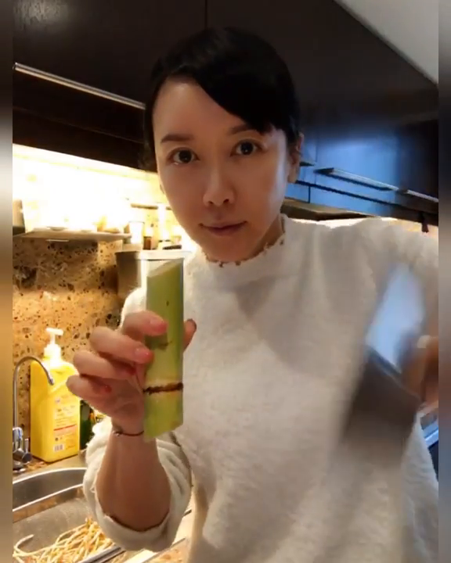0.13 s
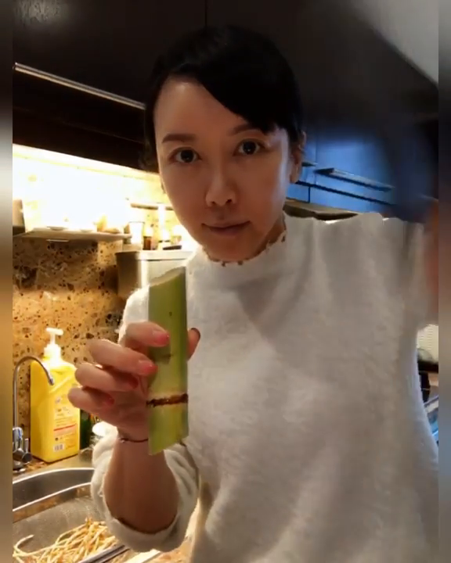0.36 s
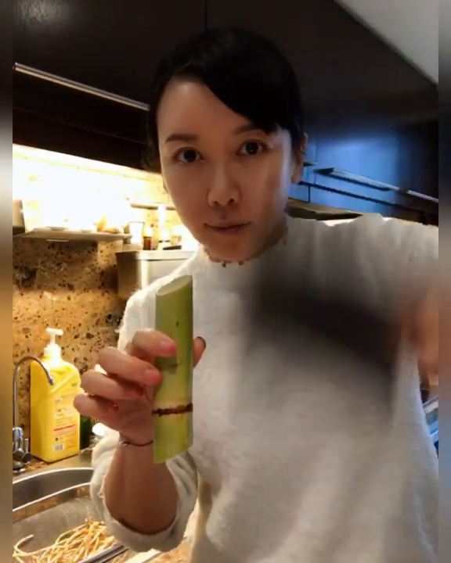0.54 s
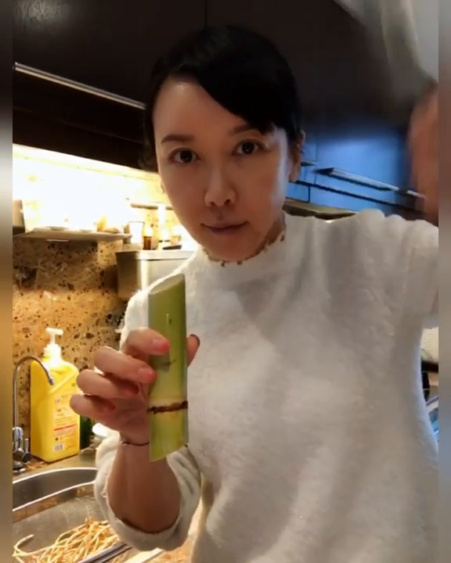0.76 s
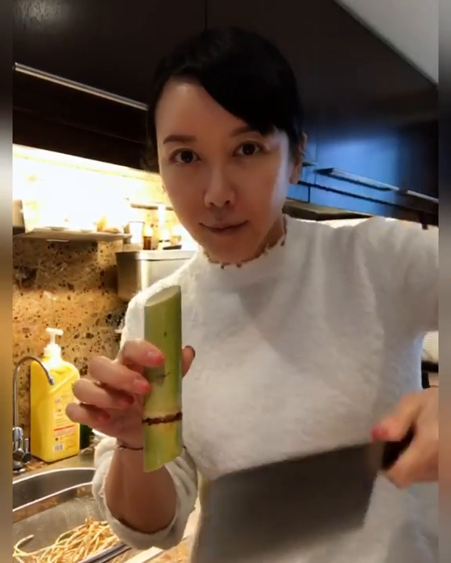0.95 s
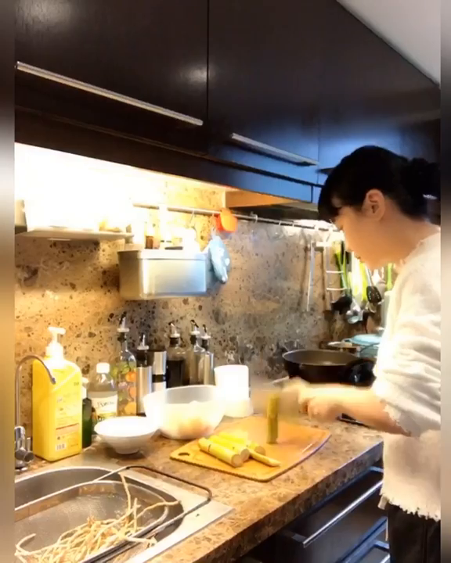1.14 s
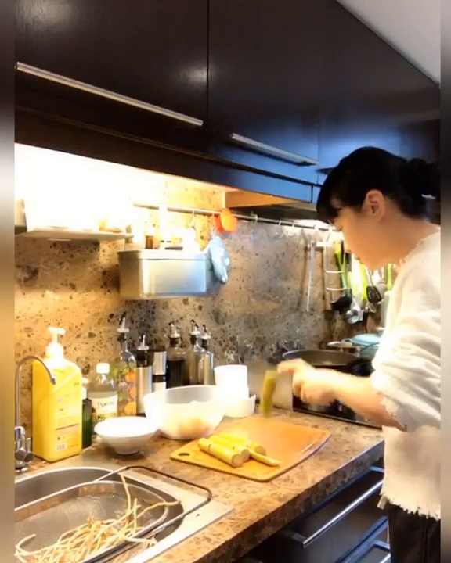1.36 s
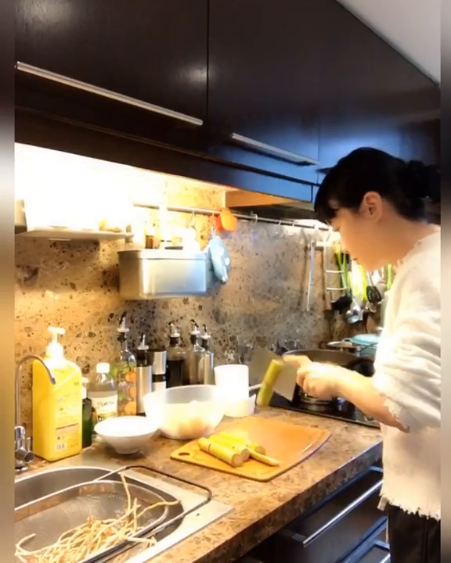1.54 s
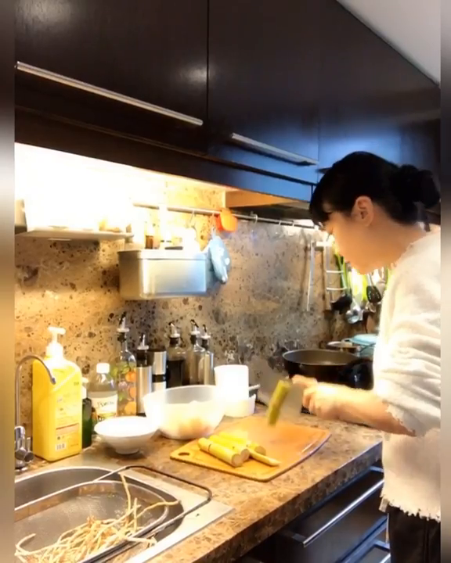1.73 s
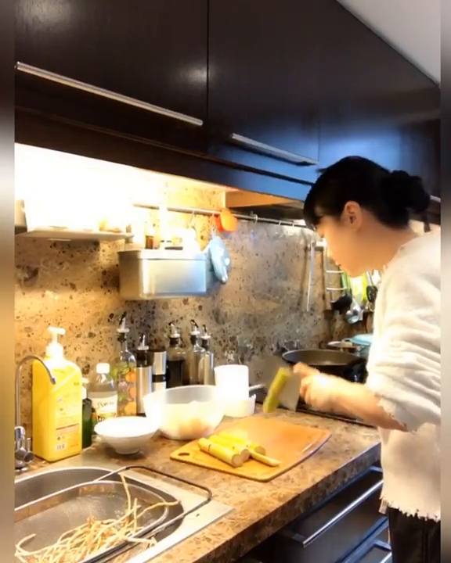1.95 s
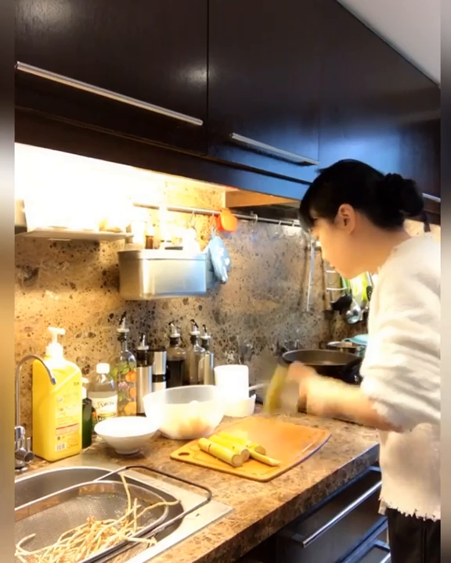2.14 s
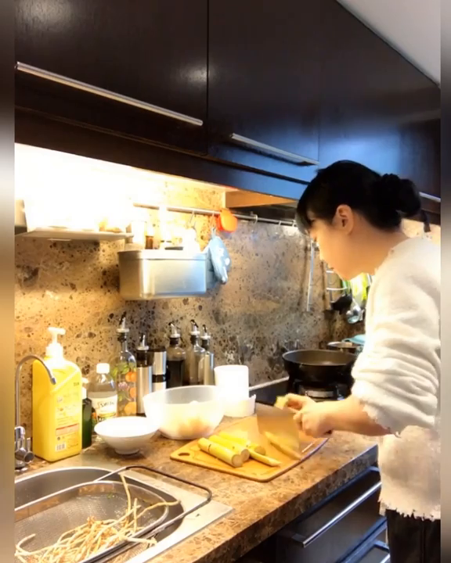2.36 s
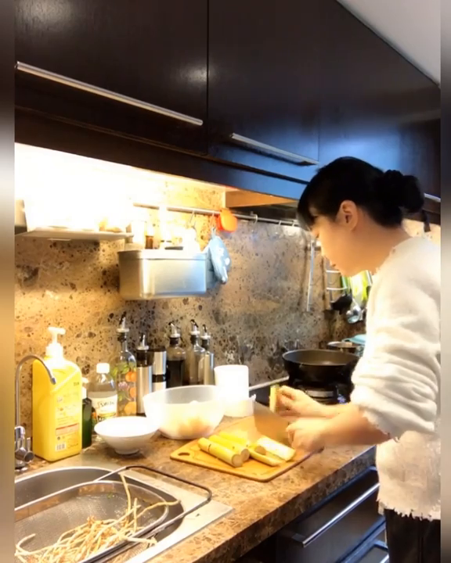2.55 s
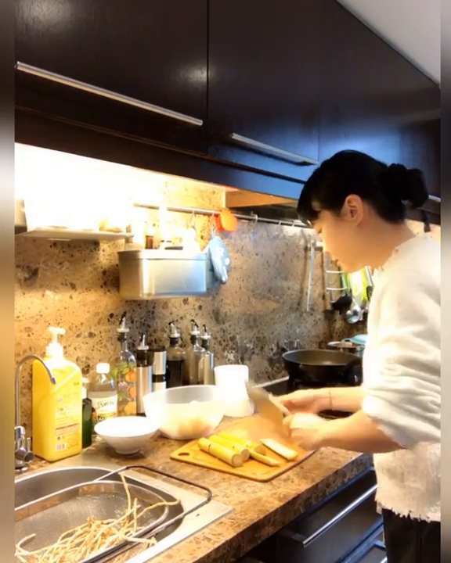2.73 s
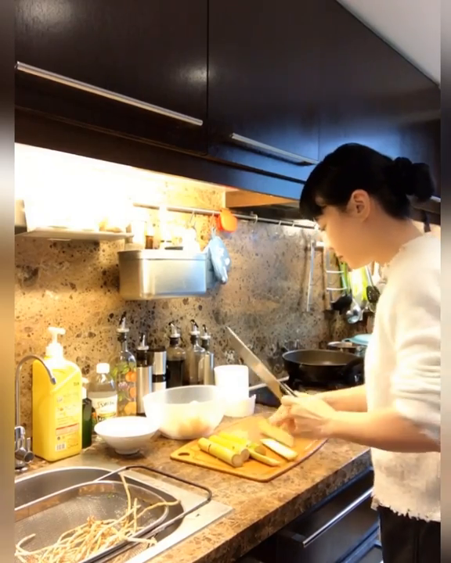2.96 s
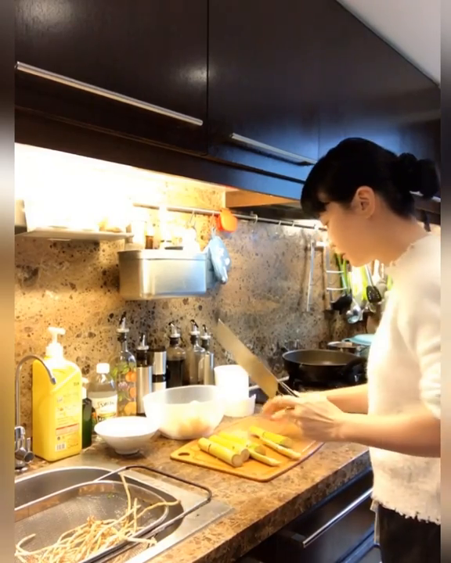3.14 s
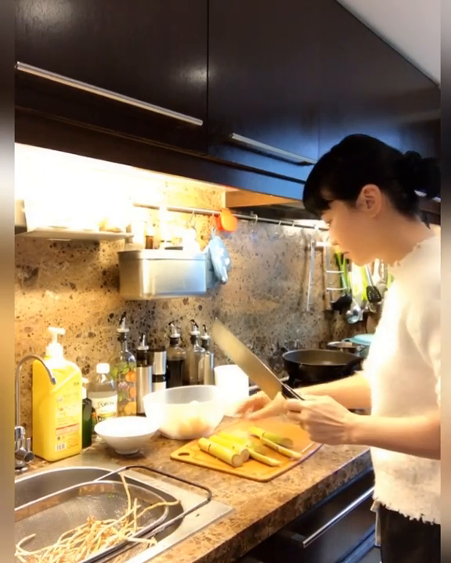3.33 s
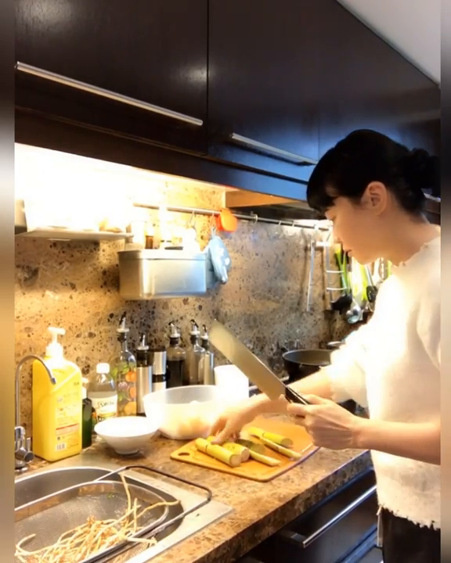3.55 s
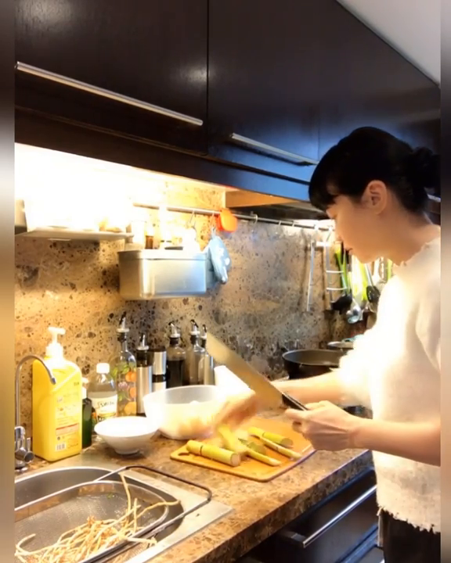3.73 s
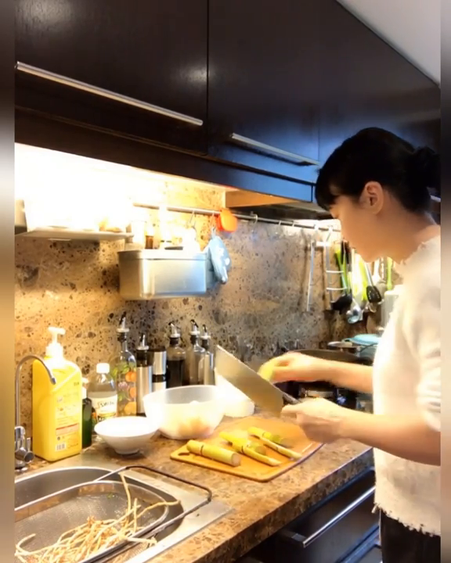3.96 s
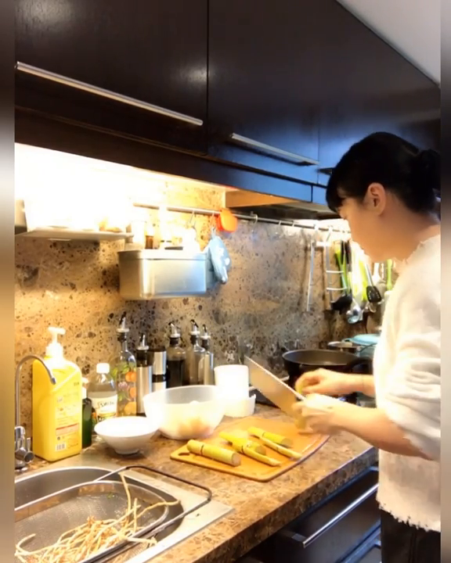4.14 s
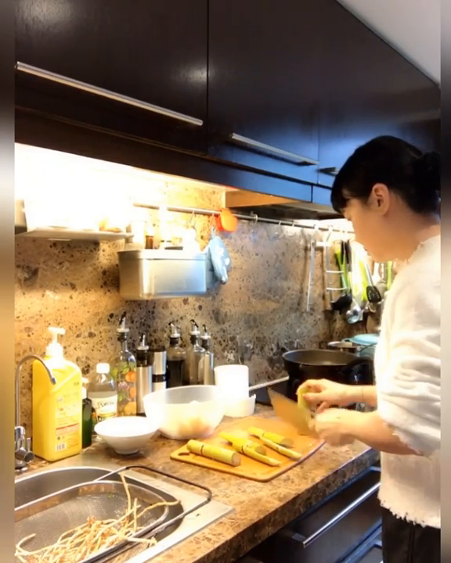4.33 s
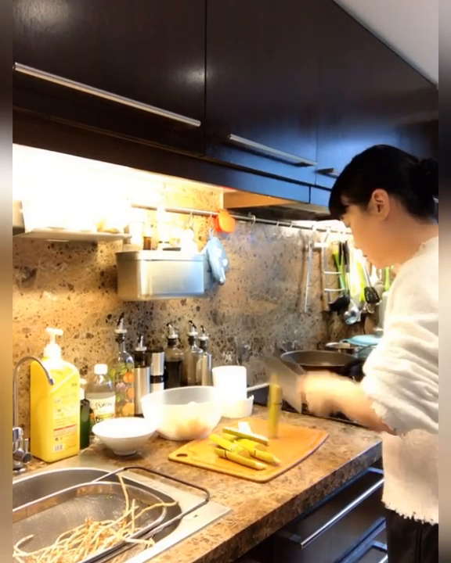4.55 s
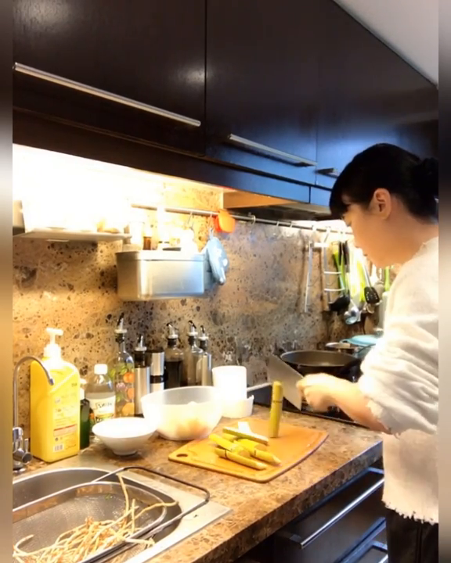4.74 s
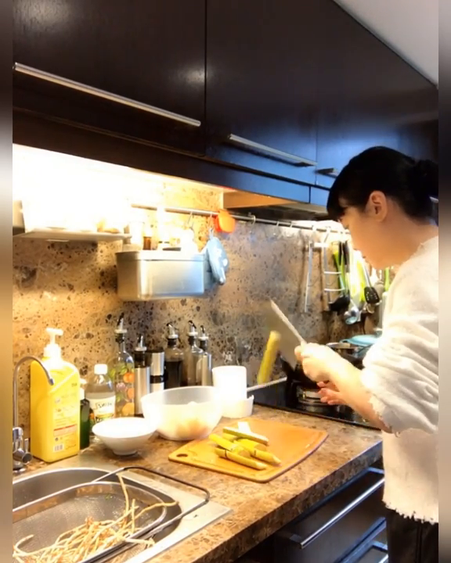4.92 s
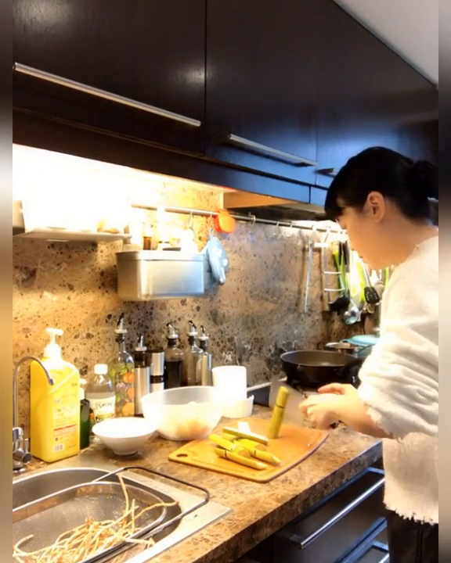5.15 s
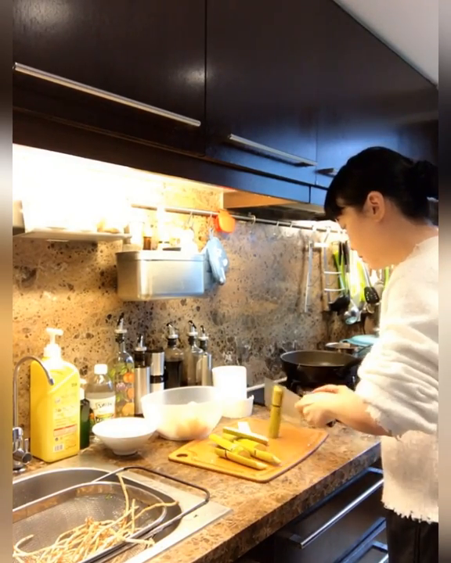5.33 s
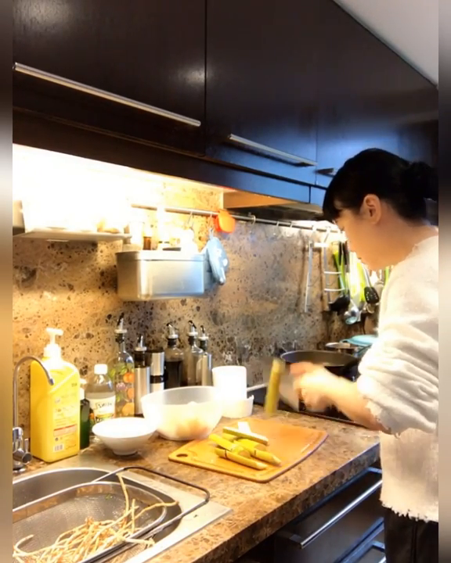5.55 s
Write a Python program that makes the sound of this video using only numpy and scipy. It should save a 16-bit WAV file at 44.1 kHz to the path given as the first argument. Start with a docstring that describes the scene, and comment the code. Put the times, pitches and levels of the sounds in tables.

```python
"""An appliance drones in a small kitchen; sugarcane rind ticks. At 1.1 s and 2.1 s a heavy cleaver,
wedged in the cane, is slammed onto a wooden board: fibres crack, board and worktop boom, the blade rings.
Split pieces topple, tick and are pushed aside, and the handled steel clinks at 2.5 s and 4.4 s.
A lighter blow follows at 4.6 s and a last heavy one at 5.0 s."""
import sys
import numpy as np
from scipy import signal
from scipy.fft import rfft, irfft
from scipy.io import wavfile
from scipy.ndimage import uniform_filter1d

SR = 44100
rng = np.random.default_rng(int(sys.argv[2]) if len(sys.argv) > 2 else 0)


def master(y):
    """Save y as 16-bit WAV."""
    cut = np.clip(np.atleast_2d(y).T, -1, 1)
    pcm = np.round(cut * 32767)  # scale
    wavfile.write(sys.argv[1], SR, pcm.astype(np.int16))


N = 246519
T = np.arange(SR // 2) / SR  # s since contact
TAPER = np.minimum(10 * (T[-1] - T), 1) ** 2
FREQ_HZ = np.maximum(np.arange(N // 2 + 1) * SR / N, 1)


def undb(db):
    """Decibels to gain."""
    return 10 ** (np.asarray(db) / 20)


def add(track, start_s, sound):
    """Mix a sound into the track."""
    start = max(int(start_s * SR), 0)
    track[start:start + len(sound)] += sound[:N - start]


def fade(t60_s):
    """Exponential decay after a contact."""
    return np.exp(-np.log(1000) * T / t60_s)


def colour(points, hz):
    """Gain of a (freq_hz, gain_db) curve at hz."""
    freq_hz, gain_db = np.transpose(points)
    return undb(np.interp(np.log(hz), np.log(freq_hz), gain_db))


def noise(gain):
    """Unit-rms noise with the given spectrum."""
    shaped = irfft(rfft(rng.standard_normal(N)) * gain, N)
    return shaped / shaped.std()


def ring(modes, weight=np.ones_like, rise_s=0.0007, neighbour_sign=-1):
    """Decaying modes; neighbours bend oppositely or together, and room echoes make each waver."""
    pitch_hz, gain_db, t60_s = np.transpose(modes)
    gains = undb(gain_db) * weight(pitch_hz) * np.sign(neighbour_sign) ** np.arange(len(pitch_hz))
    knots_s = np.arange(0, 1, .025)
    waves = np.zeros(len(T))
    for hz, gain, decay_s in zip(pitch_hz, gains, t60_s):
        swell, shift_rad = .28 * rng.standard_normal((2, len(knots_s))) * (knots_s > 0)
        envelope = gain * fade(decay_s) * (1 + np.interp(T, knots_s, swell))
        waves += envelope * np.sin(2 * np.pi * hz * T + np.interp(T, knots_s, shift_rad))
    return waves * (1 - np.exp(-T / rise_s)) * TAPER


def burst(gain, envelope, grain=0.):
    """Dense resonances: enveloped noise, flattened in spectrum, then shaped by gain(hz)."""
    hiss, scatter = rng.standard_normal((2, len(T)))
    grains = np.exp(grain * np.repeat(scatter, 20)[:len(T)] * fade(0.14))  # the room smooths them out
    spectrum = rfft(hiss * grains * envelope)
    spectrum /= np.sqrt(uniform_filter1d(np.abs(spectrum) ** 2, size=160))
    hz = np.maximum(np.arange(len(spectrum)) * SR / len(T), 1)
    return irfft(spectrum * gain(hz), len(T)) * TAPER


def kitchen(rise_s, contact_s, contact_db, early_t60_s, late_db, late_t60_s):
    """Envelope of a contact, quick echoes off tiles and cupboards, and the room tail."""
    contact = undb(contact_db) * np.exp(-(T / contact_s) ** 2)
    power = contact ** 2 + fade(early_t60_s) ** 2 + (undb(late_db) * fade(late_t60_s)) ** 2
    return np.sqrt(power) * (1 - np.exp(-T / rise_s))


# air spectrum: freq_hz, gain_db
AIR_SPECTRUM = [(20, -66.5), (32, -65.5), (70, -68.5), (110, -82.5), (180, -76), (300, -85.5), (500, -90.5),
                (1000, -93), (2000, -98.5), (4000, -107), (10000, -113), (12500, -122)]

def room_air(level_db=-47.5):
    """Steady, mostly low room noise."""
    return undb(level_db) * noise(colour(AIR_SPECTRUM, FREQ_HZ))


# drone bands: centre_hz, width_hz, level_db
DRONE_BANDS = [(46.76, 5.5, -42.5), (76.7, 12, -49.5), (160, 44, -61.5), (234.2, 10, -67), (352, 4, -67)]

def appliance():
    """A low drone: narrow noise bands that waver."""
    return sum(undb(level_db) * noise(1 / (1 + ((FREQ_HZ - centre_hz) / width_hz * 2) ** 2))
               for centre_hz, width_hz, level_db in DRONE_BANDS)


def worktop_echo(hz, delay_s=.001136, strength=.25):
    """The bounce off the worktop ripples the spectrum."""
    return np.abs(1 + strength * np.exp(-2j * np.pi * hz * delay_s))


def taps(touches, modes, envelope, corner_hz=10500):
    """A hard body clicks and rings; the place of each touch weights its modes."""
    out = np.zeros(N)
    for start_s, click_db, ring_db, centre_hz, width_oct in touches:
        place = lambda hz: 1 / (1 + (np.log2(hz / centre_hz) / width_oct) ** 2)
        click_gain = lambda hz: place(hz) * worktop_echo(hz) / np.sqrt(1 + (hz / corner_hz) ** 12)
        click = undb(click_db) * burst(click_gain, envelope, grain=0.097)
        add(out, start_s, click + undb(ring_db) * ring(modes, place, rise_s=0.0009))
    return out


# short piece of cane: pitch_hz, gain_db, t60_s
CANE_MODES = [(2400, 8.5, 0.21), (3210, 10, 0.033), (4130, 8, 0.042), (4450, 2, 0.18)]
# touches on the rind: start_s, click_db, ring_db, centre_hz, width_oct
RIND_TICKS = [ (0.018, -13.5, -61, 7400, 1), (2.546, -10, -51, 3730, 0.3), (3.011, -21.5, -63, 8200, 0.95),
              (3.377, -11, -55, 4050, 0.49), (3.496, -14, -68, 2480, 0.53), (3.592, -15, -64, 3100, 0.4), ]

def rind_ticks():
    """Hard rind clicks as pieces are gripped and gathered."""
    envelope = kitchen(rise_s=0.00046, contact_s=0.0015, contact_db=15.5,
                       early_t60_s=0.3, late_db=-3, late_t60_s=0.31)
    return taps(RIND_TICKS, CANE_MODES, envelope)


# tearing fibres: freq_hz, gain_db
FIBRE_SPECTRUM = [(100, -4.5), (1000, 15.5), (2400, 16.5), (3300, 14), (4400, 16), (6200, 16.5), (8000, 13),
                  (10000, 17), (12000, 3)]

def crack(gain_db):
    """Rind and fibres snap."""
    envelope = kitchen(rise_s=0.0006, contact_s=0.006, contact_db=2.5,
                       early_t60_s=.23, late_db=-14, late_t60_s=.5)
    snap = burst(lambda hz: colour(FIBRE_SPECTRUM, hz) * worktop_echo(hz), envelope, grain=0.27)
    return undb(gain_db) * snap


# board alone: pitch_hz, gain_db, t60_s
BOARD_MODES = [(272, -32, .25), (323, -26, .25), (355, -29, .33), (398, -27, .25), (462, -27, .3),
               (503, -29, .3), (553, -21, .23), (598, -29, .25), (640, -28, .2), (696, -23, .23),
               (785, -23, .22), (834, -28, .35), (937, -30, .28), (1010, -20, .17), (1060, -26, .2),
               (1127, -23, .26), (1205, -28, .25), (1330, -22, .13), (1445, -22, .22), (1521, -22, .18),
               (1765, -26, .18), (1873, -27, .16)]
# blade gripped by the cane: pitch_hz, gain_db, t60_s
WEDGED_MODES = [(2116, -35, .4), (2230, -33, .16), (2450, -36, .42), (2934, -35, .18)]
# dense wood resonances: freq_hz, gain_db
WOOD_SPECTRUM = [(60, 3.5), (130, 12.5), (200, 27.5), (400, 26), (800, 26.5), (1400, 25.5), (2200, 20.5),
                 (3200, 19.5), (6000, 17), (12000, 2)]
# board and worktop bending as one: pitch_hz, gain_db, t60_s
THUD_MODES = [(56, -33, .25), (78, -28, .22), (122, -31, .2), (149, -28, .2), (168, -20, .34),
              (189, -20, .18), (227, -22, .29)]

def board(thud_db, knock_db, corner_hz, yield_s=0.0031):
    """The board knocks and shakes the blade, then the worktop yields; softer contacts sound duller."""
    envelope = kitchen(rise_s=0.0027, contact_s=0.0056, contact_db=8,
                       early_t60_s=0.23, late_db=-12, late_t60_s=0.6)
    softness = lambda hz: 1 / np.sqrt(1 + (hz / corner_hz) ** 5)
    knock = ring(BOARD_MODES + WEDGED_MODES, softness, rise_s=.001)
    knock += burst(lambda hz: colour(WOOD_SPECTRUM, hz) * softness(hz), envelope)
    thud = ring(THUD_MODES, rise_s=0.0028, neighbour_sign=1)
    return undb(thud_db) * np.interp(T - yield_s, T, thud) + undb(knock_db) * knock


# cleaver blows: start_s, blade_lag_s, landing_db, thud_db, knock_db, corner_hz, crack_db
CHOPS = [ (1.078, 0.0038, -26, 3, -3.5, 1090, -0.5), (2.146, 0.023, -6.5, 4, 3.5, 1900, -4.5),
         (4.556, .006, -6.5, -5.5, -5.5, 1490, -21), (5.017, .002, -11, 4, 3, 1340, 1), ]

def chops(blade_over_knock_db=1.5):
    """The cane lands on the board; the wedged blade follows, splits it and rings."""
    out = np.zeros(N)
    for start_s, blade_lag_s, landing_db, thud_db, knock_db, corner_hz, crack_db in CHOPS:
        landing = crack(crack_db - 2) + board(thud_db, knock_db, corner_hz)  # tears fewer fibres
        add(out, start_s, undb(landing_db) * landing)
        blade = undb(knock_db + blade_over_knock_db) * ring(WEDGED_MODES)
        add(out, start_s + blade_lag_s, crack(crack_db) + board(thud_db, knock_db, corner_hz) + blade)
    return out


# cane toppling or set down: start_s, thud_db, knock_db, corner_hz, click_db
CANE_KNOCKS = [ (2.309, -11, -21, 917, -26.5), (2.328, -30, -28, 1190, -28), (2.386, -17, -14.5, 1568, -39),
               (2.519, -14.5, -24, 522, -44), (2.844, -21.5, -39.5, 395, -48),
               (2.942, -19, -21.5, 440, -60), (3.429, -31, -31, 1395, -39.5),
               (3.591, -29, -35.5, 1550, -51), (4.195, -16, -21, 580, -55), (4.407, -17, -12.5, 1460, -33),
               ]

def cane_knocks(rock_cycles=9, rock_db=-9):
    """A piece meets the board with a click and rocks once, later after a softer contact."""
    out = np.zeros(N)
    for start_s, thud_db, knock_db, corner_hz, click_db in CANE_KNOCKS:
        add(out, start_s, board(thud_db, knock_db, corner_hz) + crack(click_db))
        add(out, start_s + rock_cycles / corner_hz, undb(rock_db) * board(thud_db, knock_db, corner_hz))
    return out


# free blade: pitch_hz, gain_db, t60_s
STEEL_MODES = [(1245, -3, .16), (1712, -13, .25), (2078, -1, .25), (2250, -10, .2), (2401, -13, .25),
               (2680, -10, .38), (2898, -9, .23), (3618, -13, .22), (3910, -15, .12), (4170, -8, .1),
               (4753, -15, .2), (5286, -2, .25), (5426, -8, .08), (5749, -18, .22), (6775, -6, .21),
               (7036, -17, .24), (8250, -10, .2), (8900, -15, .15), (9760, -7, .1), (9815, -9, .2),
               (10750, -13, .2), (11300, -12, .15)]
# touches on the steel: start_s, click_db, ring_db, centre_hz, width_oct
BLADE_CLINKS = [ (2.545, -12, -32, 2800, 0.075), (2.547, -27, -39, 7150, 0.55),
                (4.407, 11.5, -23, 2380, 0.55), (4.430, -6, -28, 9800, 0.25),
                (4.455, 10.5, -21.5, 3520, 1.28), ]

def blade_clinks():
    """The free blade clinks as it is handled."""
    envelope = kitchen(rise_s=0.0005, contact_s=0.003, contact_db=14,
                       early_t60_s=0.27, late_db=-23, late_t60_s=.42)
    return taps(BLADE_CLINKS, STEEL_MODES, envelope)


# pushes: peak_s, half_width_s, level_db
CANE_SLIDES = [(2.551, 0.073, -54), (3.542, 0.045, -61.5)]

def cane_slides(catch_samples=100, catch_spread_db=3):
    """Fibres catch and slip as pieces are pushed along the board."""
    t = np.arange(N) / SR
    push = sum(undb(level_db) * np.exp(-((t - peak_s) / half_width_s) ** 2)
               for peak_s, half_width_s, level_db in CANE_SLIDES)
    catches = undb(catch_spread_db * rng.standard_normal(N // catch_samples + 1))
    return push * np.repeat(catches, catch_samples)[:N] * noise(colour(FIBRE_SPECTRUM, FREQ_HZ))


def scene():
    """Cane and cleaver over the room's drone, in mono."""
    work = chops() + cane_knocks() + blade_clinks() + rind_ticks() + cane_slides()
    return (work + room_air() + appliance())[None]


def record(dry):
    """Round the highest peaks, roll off the top octave and cut steeply above."""
    drive, roll_off_hz, cut_hz = 1.05, 11010, 12300
    rounded = np.tanh(drive * dry) / drive
    mellow = signal.sosfilt(signal.butter(6, roll_off_hz, fs=SR, output="sos"), rounded)
    return signal.sosfilt(signal.ellip(10, .2, 75, cut_hz, fs=SR, output="sos"), mellow)


dry = scene()
out = record(dry)
master(out)
```